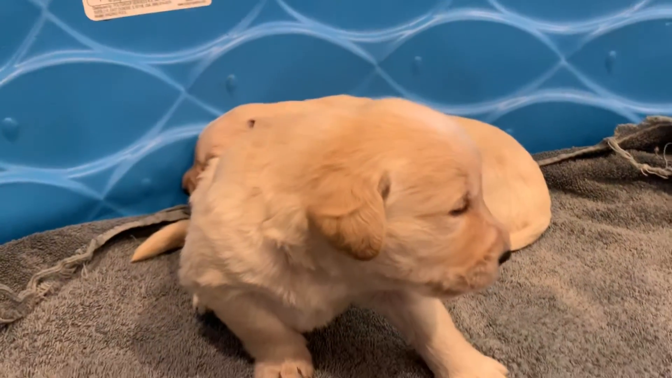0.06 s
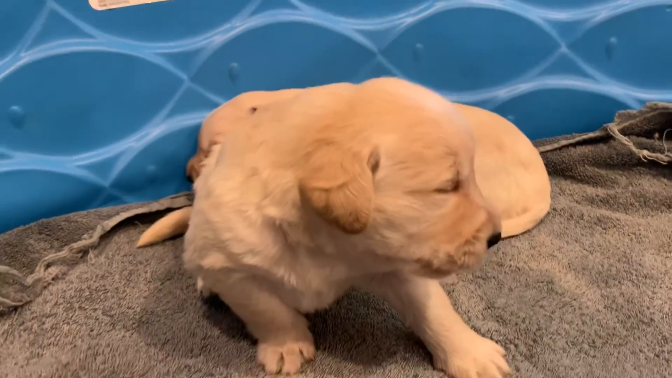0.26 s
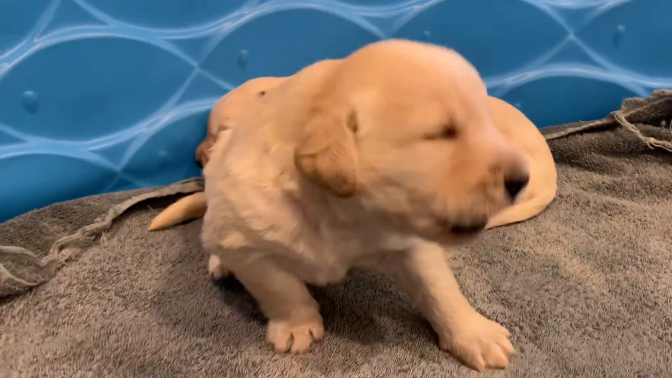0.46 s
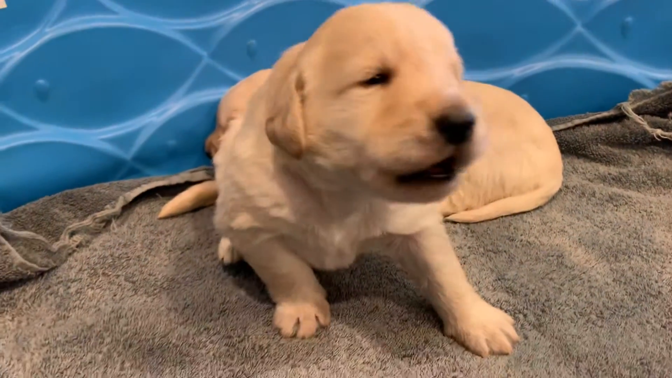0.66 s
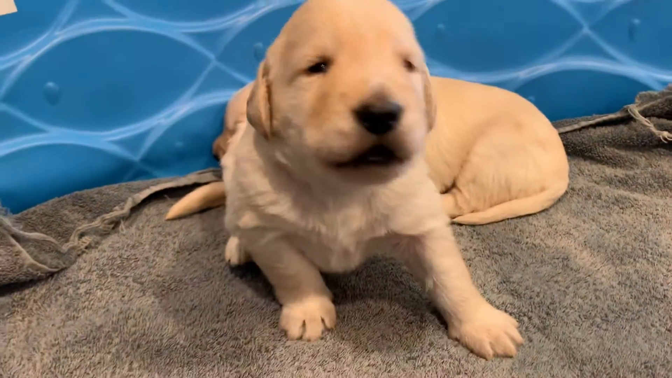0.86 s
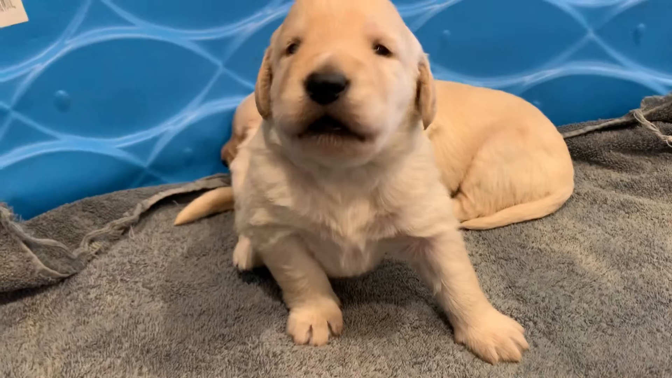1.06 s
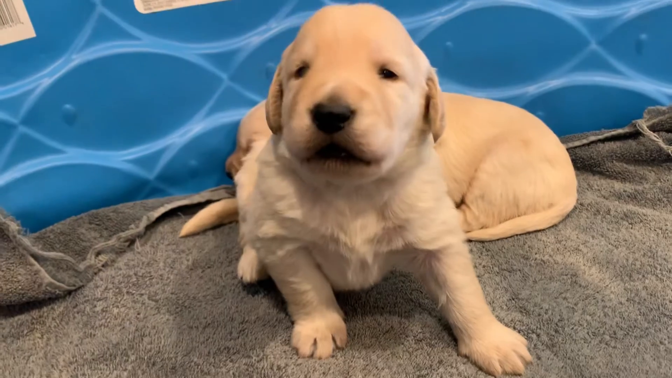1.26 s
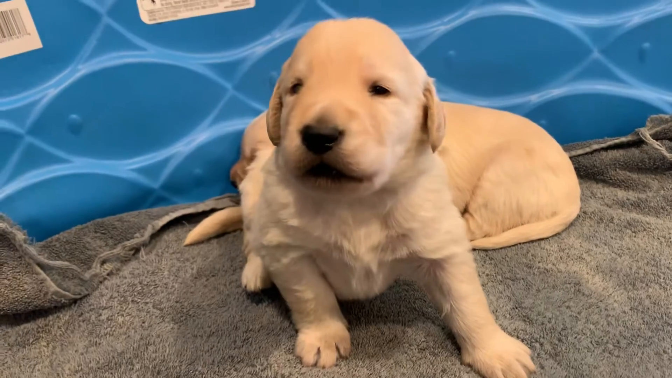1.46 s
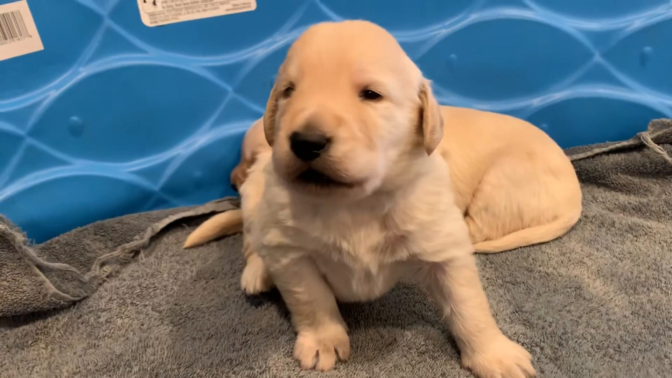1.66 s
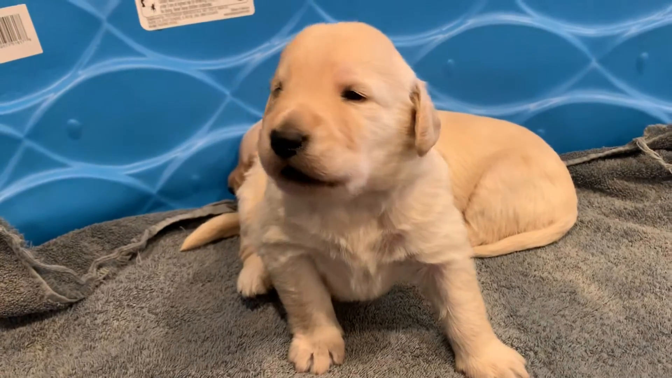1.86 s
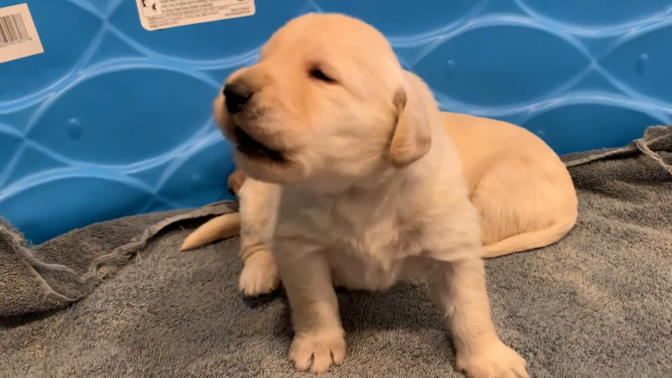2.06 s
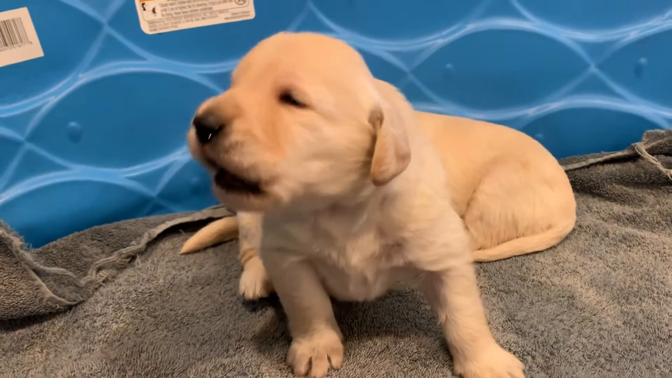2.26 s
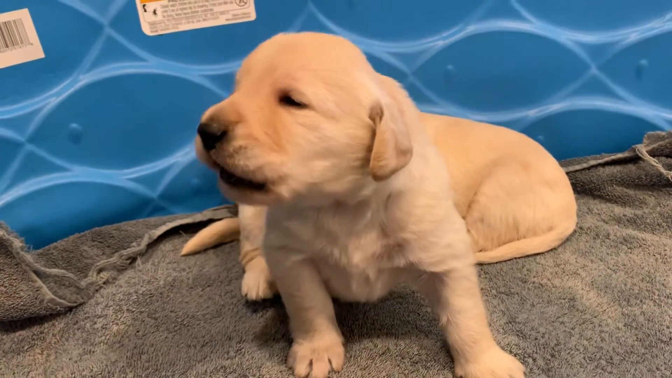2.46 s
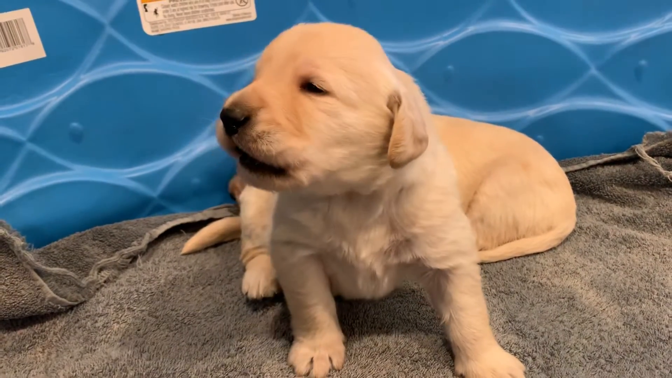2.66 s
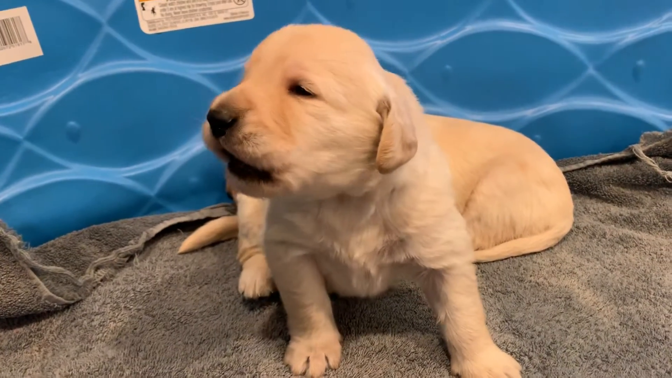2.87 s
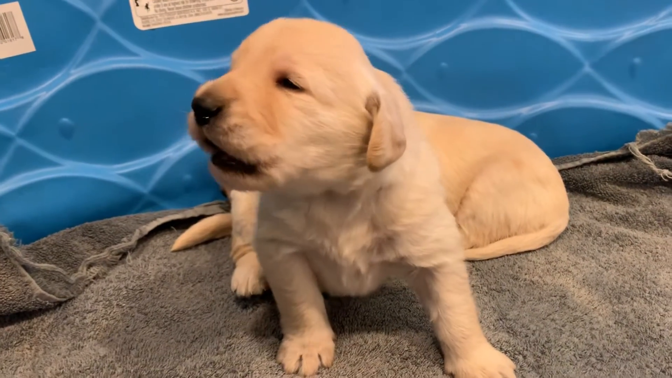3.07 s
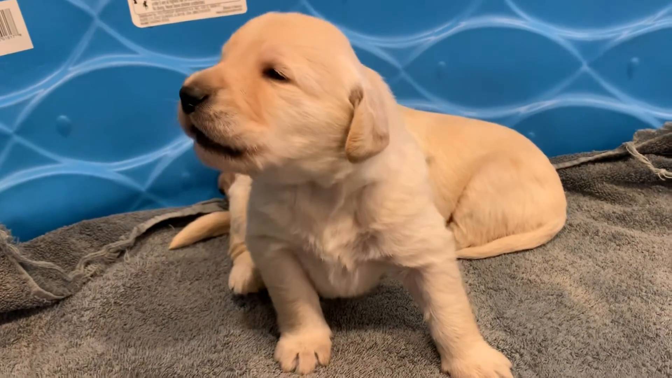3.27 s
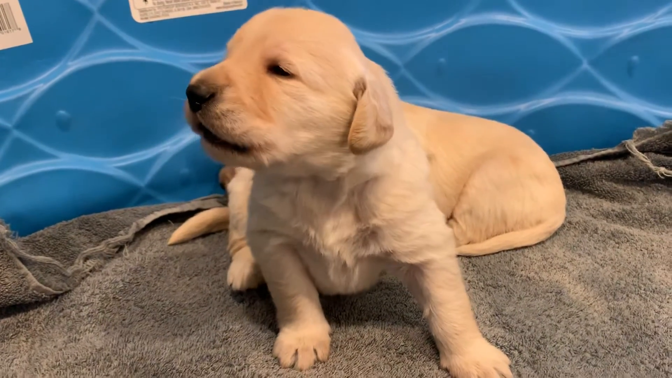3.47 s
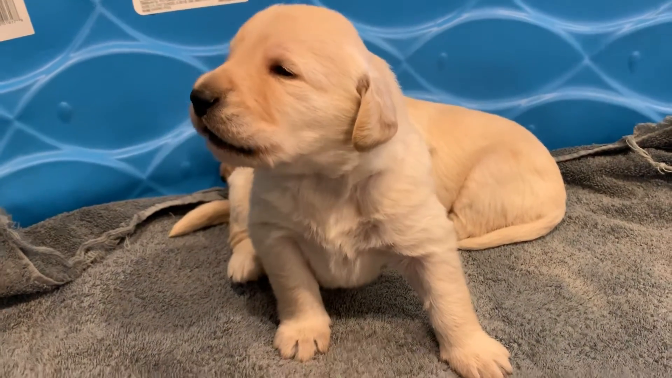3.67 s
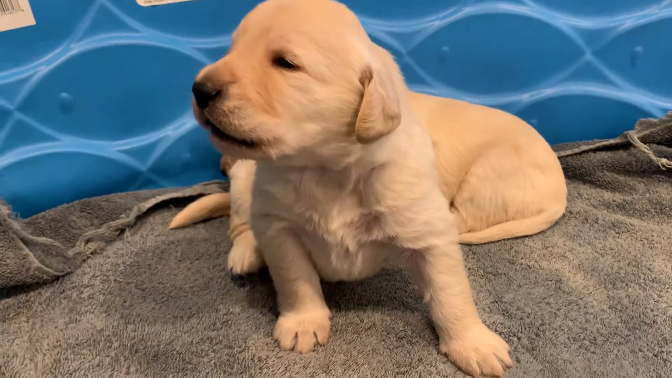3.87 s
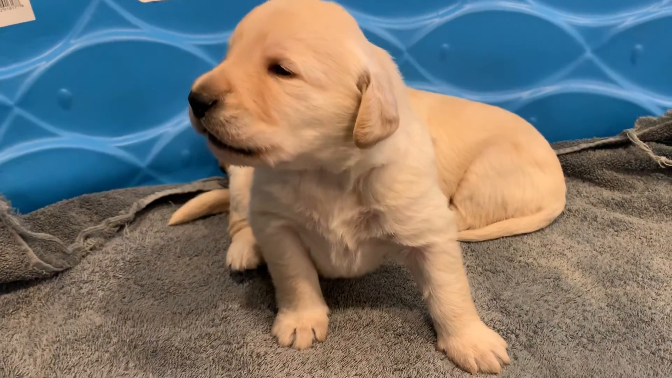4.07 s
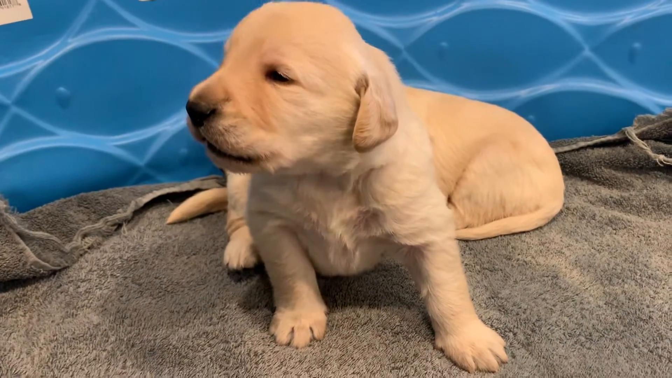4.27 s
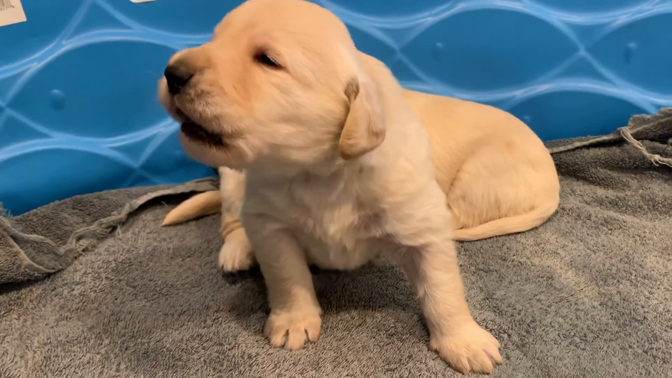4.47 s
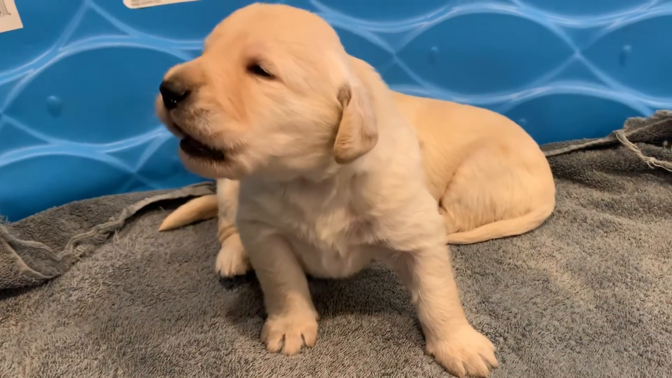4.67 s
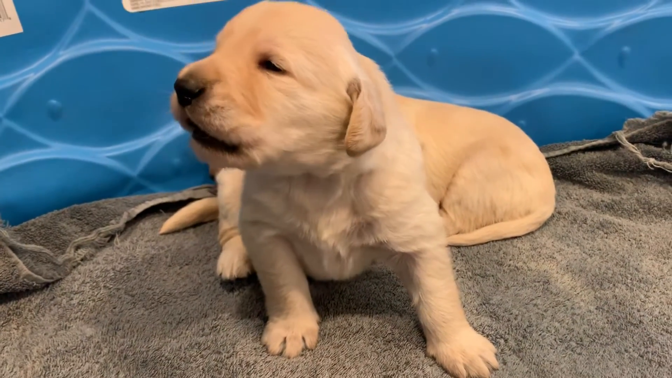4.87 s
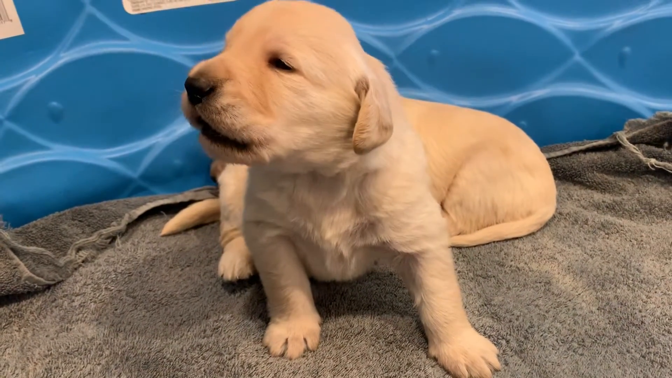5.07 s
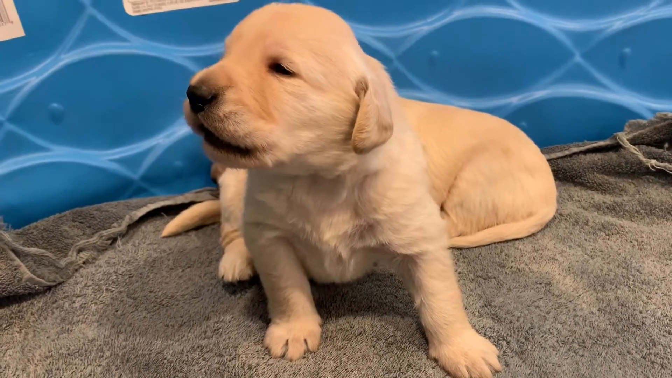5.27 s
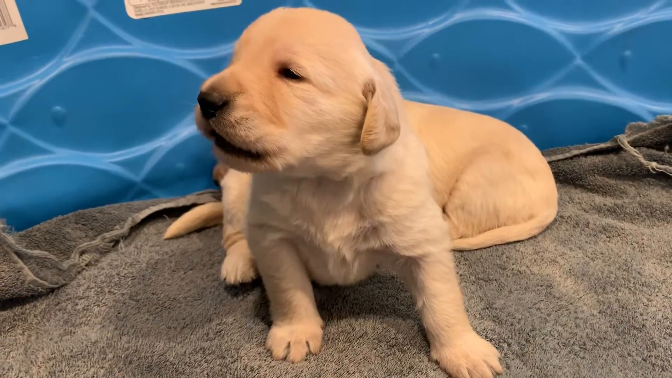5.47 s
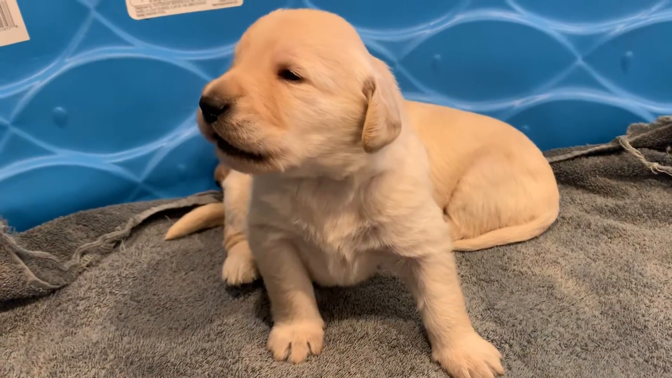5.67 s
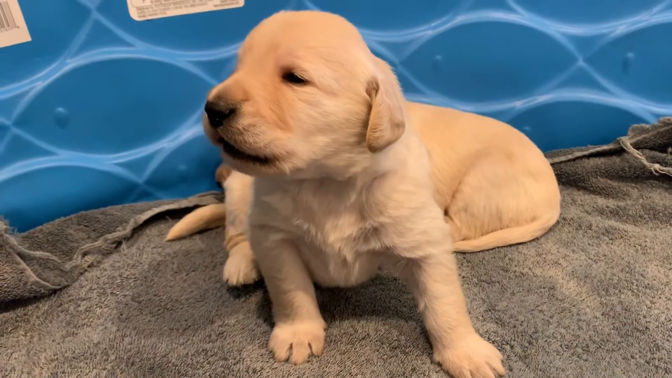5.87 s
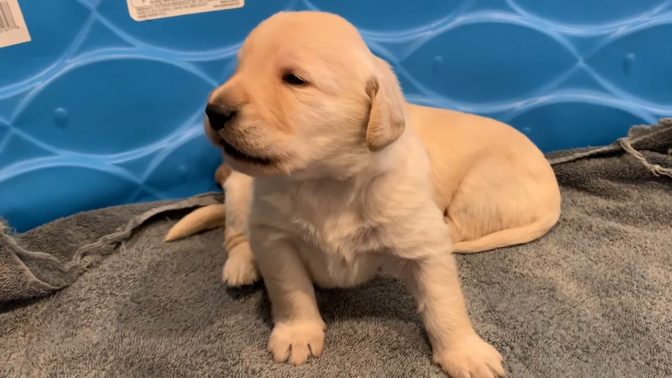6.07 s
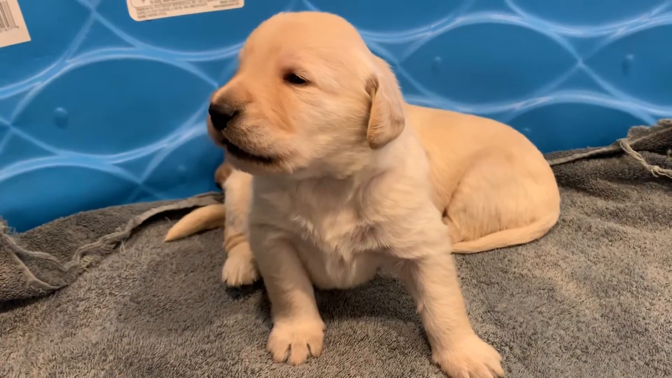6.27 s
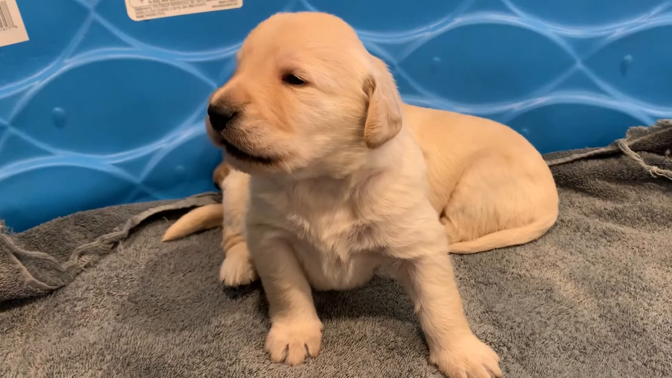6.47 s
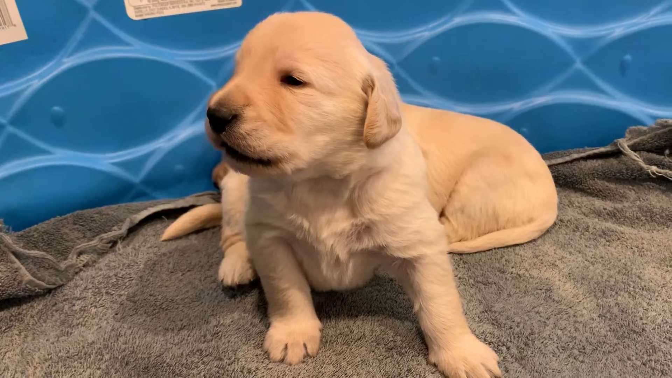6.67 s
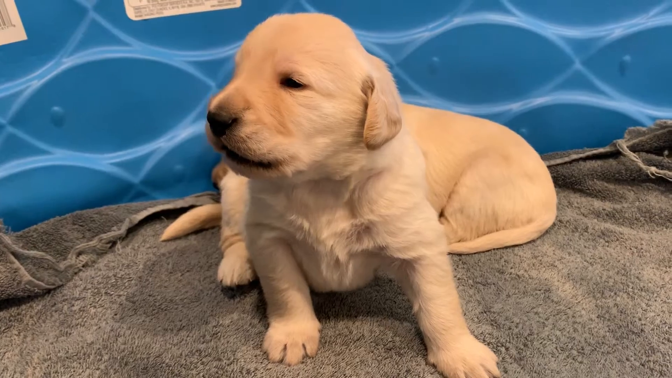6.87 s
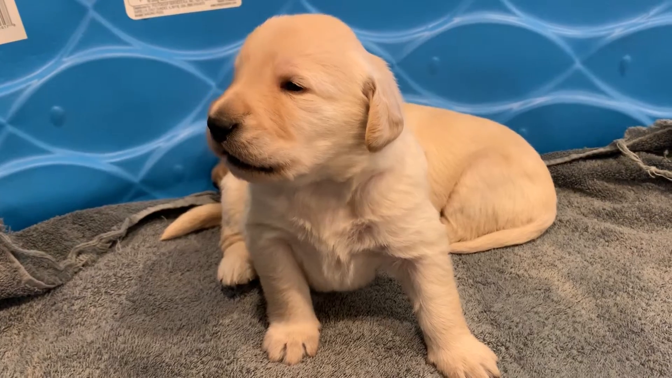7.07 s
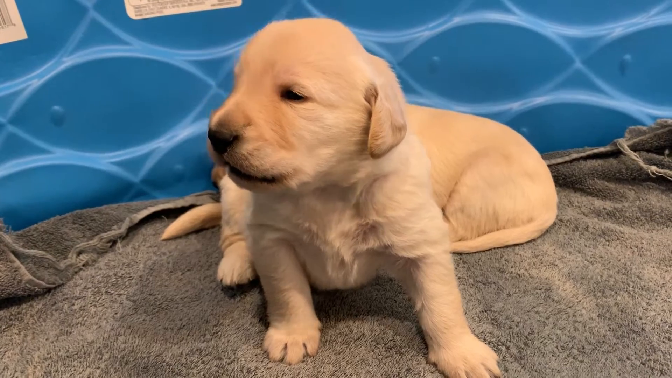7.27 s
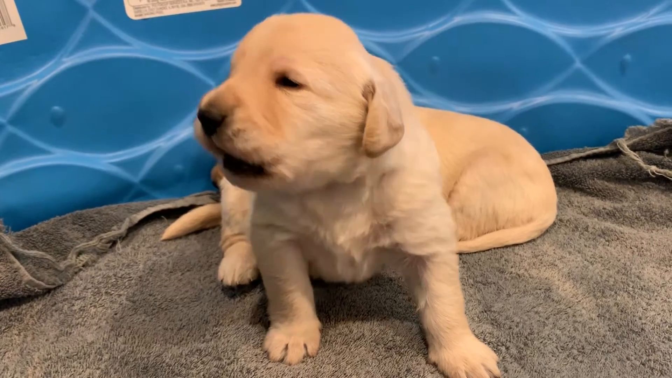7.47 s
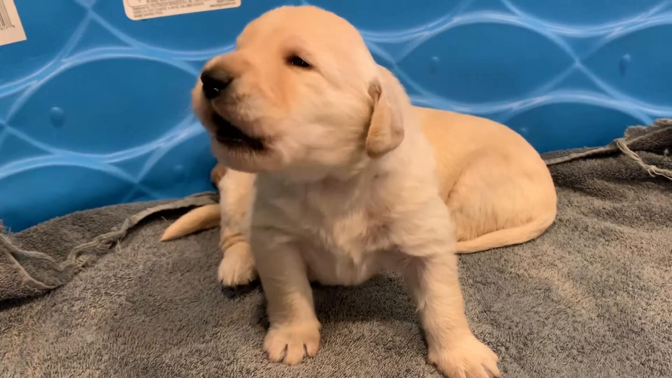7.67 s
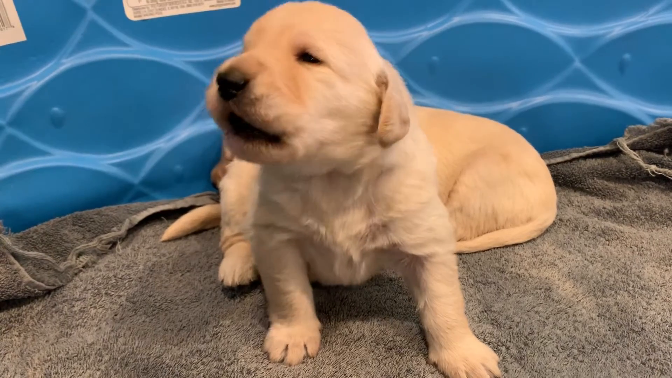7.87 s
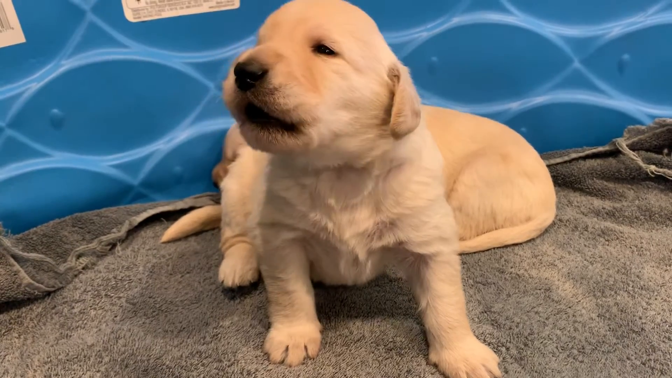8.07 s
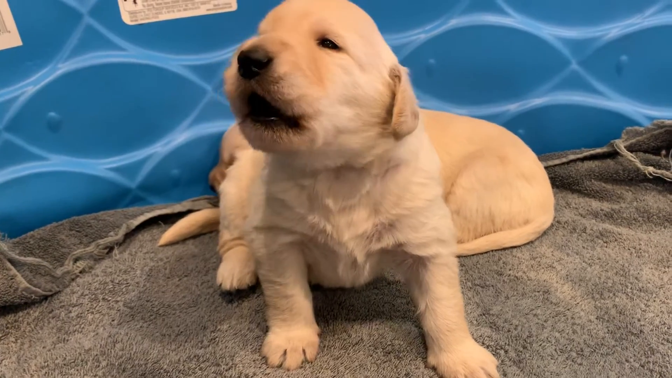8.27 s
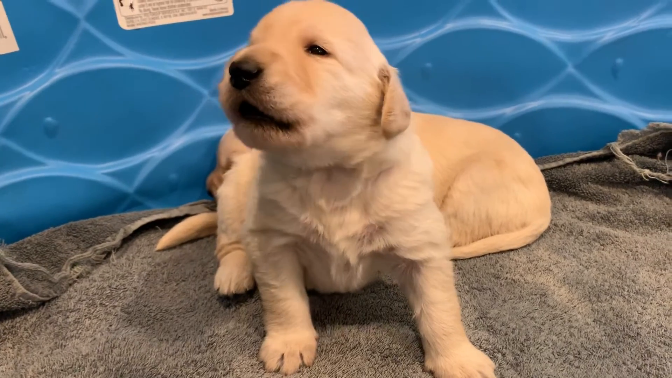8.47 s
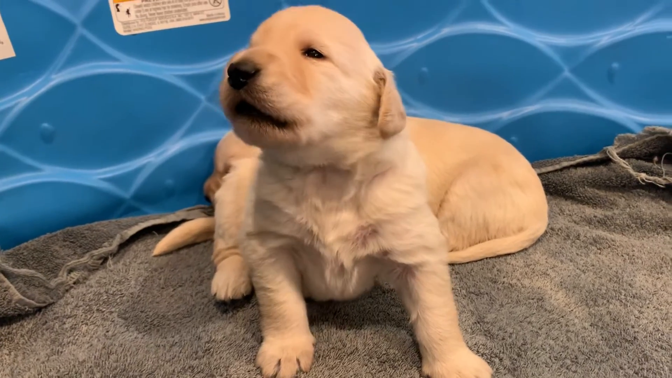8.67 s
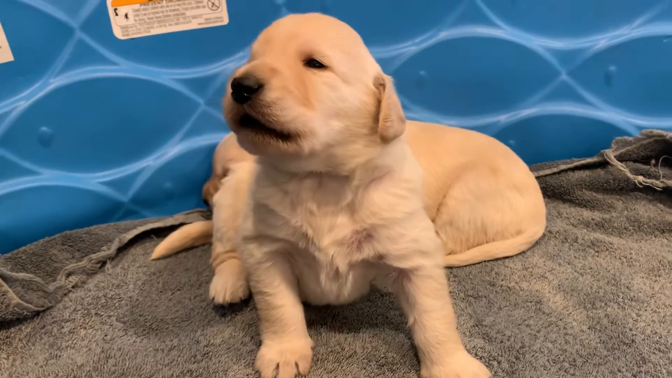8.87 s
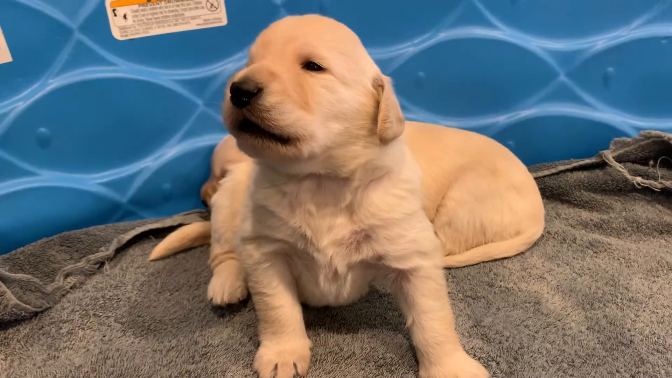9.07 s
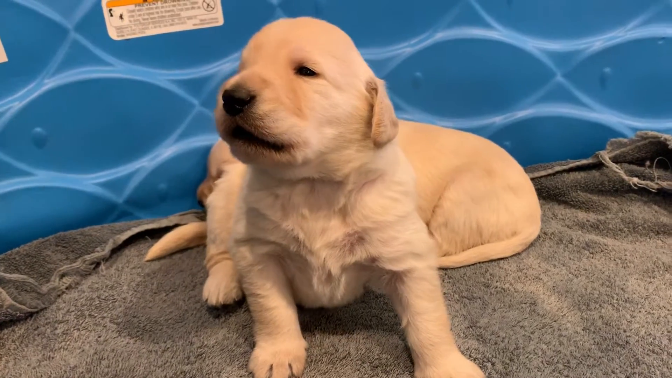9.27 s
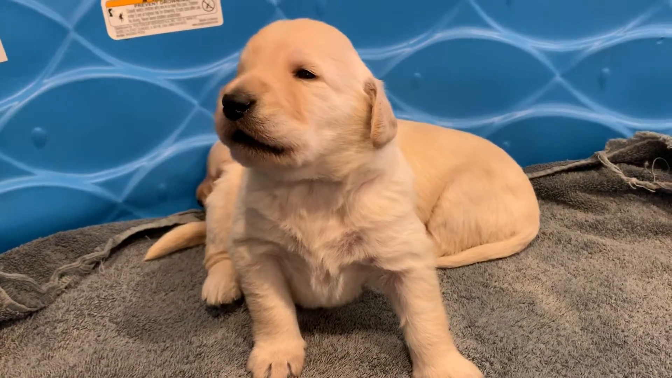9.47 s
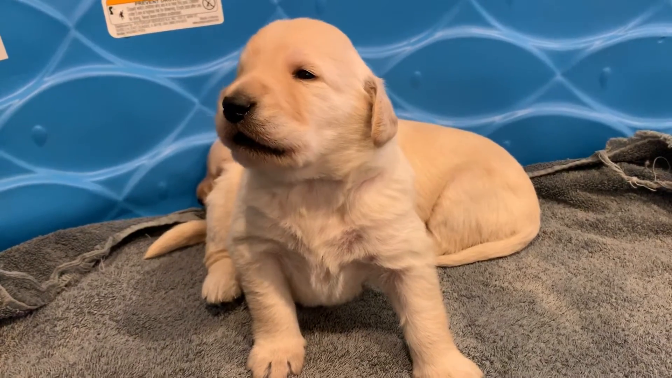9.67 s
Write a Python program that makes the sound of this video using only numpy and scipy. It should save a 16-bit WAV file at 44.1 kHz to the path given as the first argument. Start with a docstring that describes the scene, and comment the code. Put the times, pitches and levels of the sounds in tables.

```python
"""Throbbing growls of a very young puppy, close by: four calls that tighten into rough, high yelps and sink back.
A soft grunt and a thin whimper end it; the room rumbles and hums faintly.
Voice: fold pulses and turbulence through throat, mouth and teeth filters, one pitch sweep from growl to yelp.
Whimper: a few sine partials. Grunts, bumps, rumble: filtered noise. Hum: a sine.
Head direction, pen walls and a short room tail shape the stereo."""
import sys
import numpy as np
from scipy import signal
from scipy.fft import rfft, irfft, next_fast_len
from scipy.io import wavfile
from scipy.ndimage import uniform_filter1d, minimum_filter1d, map_coordinates

SR = 44100
rng = np.random.default_rng(int(sys.argv[2]) if len(sys.argv) > 2 else 0)


def output_pcm(signal):
    """Save a mono or channel-first signal as 16-bit PCM at the path in sys.argv[1].

    Samples are clipped to [-1, 1] before scaling.
    """
    pcm = np.clip(np.atleast_2d(signal).T, -1, 1) * 32767
    wavfile.write(sys.argv[1], SR, np.round(pcm).astype(np.int16))


N = 428211
T = np.arange(N) / SR  # s

# growl under each of the four calls: t/s, resting pitch f/Hz, extra level/dB, extra rasp/dB
GROWLS = [
    [(.025, 145.2, -5.5, -4), (.15, 160, 0.5, -9.5), (.37, 171.6, 2, -21), (.46, 160, 0.5, 2),
     (.75, 149.8, 1, 2), (.87, 149.8, -0.5, -3), (.985, 150.3, -4, -23)],
    [(2.019, 184.8, -3.5, 0), (2.4, 190.6, 1, -3.5), (2.55, 192, -2.5, -14.5), (2.7, 190.1, -3.5, -12),
     (2.8, 189.6, -0.5, -3), (2.92, 171.4, 1, 3.5), (3.16, 174.3, -2, -7), (3.22, 165.2, -17, 0),
     (3.29, 165.1, -22.5, 0)],
    [(4.413, 210.6, -2.5, 3), (4.77, 189.9, -0.5, -8.5), (4.83, 197.5, 1, 3.5), (5., 168, 0.5, 4),
     (5.6, 153, 0, 6), (5.85, 135.2, -0.5, 0.5), (6.06, 117, -5.5, 5), (6.14, 120.7, 1, -1),
     (6.235, 112.9, 0.5, -12)],
    [(7.502, 191.4, -4.5, 0.5), (7.92, 181.6, 0.5, -7.5), (8.05, 186.5, 1, 1.5), (8.2, 180.8, 3, 2.5),
     (8.47, 169.9, 0.5, -3.5), (8.51, 149.7, -4.5, 1.5), (8.58, 144.2, -4, -18), (8.67, 145, -16.5, -6)],
]
# growl versus pitch: f/Hz, roughness/0-1, throat level/dB, mouth level/dB, rasp level/dB
TENSION = [(112, .3, -57, -63, -73.5), (136, .28, -44.5, -55, -75), (159.2, .3, -39, -46.5, -65.5),
           (189.65, .3, -35, -37, -57), (243, .38, -30.5, -31, -54), (277.5, .42, -28.5, -25.5, -47),
           (379.8, .75, -29.5, -20, -40)]
# runs of throbs: first catch t/s, end t/s, throb rate at start, middle, end f/Hz
THROBS = [(0.028, 0.438, 23.4, 24.15, 27.25), (2.38, 2.946, 25, 20.21, 22.91),
          (4.784, 6.181, 19.39, 21.9, 17.27), (7.89, 8.219, 22.7, 23.28, 20.23)]
# yelps: start t/s, climb/s, arch/s, fall/s, top pitch f/Hz, lateness of climb (exponent),
# added roughness/0-1, extra mouth level/dB, extra rasp/dB, rasp fading along the arch/dB
YELPS = [(.494, .046, 0.14, .038, 1265, 1.7, .33, -0.5, 5.5, 8),
         (2.055, .078, 0.14, .059, 1353, 1.3, .18, 0.5, 2, 2.5),
         (2.987, .057, 0.05, .036, 965, 3.4, .13, 0.5, -7.5, -1.5),
         (4.443, .073, .131, .06, 1375, 1.05, .17, 0.5, 0.5, 0.5),
         (7.524, .078, .159, .049, 1407, .95, .13, -1, 1.5, 3.5),
         (8.274, .05, 0.069, .026, 946.7, 3, .07, 0.5, -5, 0)]
# shared by all yelps: stage (0 leap, 1 lock, 2 crack, 3 fall), roughness/0-1, throat, mouth, rasp level/dB
YELP_STAGES = [(0, .48, -33, -20.5, -23), (.5, .4, -42.5, -19.5, -22.5), (1, .18, -46.5, -19.5, -22.5),
               (1.499, 0.012, -48.5, -18.5, -27), (1.95, .1, -47.5, -19.5, -30),
               (2.15, .32, -46.5, -21.5, -35.5), (3, .5, -33.5, -22.5, -45)]
# lip opening in the growl: t/s, opening/0-1
LIP_OPENING = [(.35, 0), (.5, .2), (.7, .8), (2, 1)]

# relative voice spectra: f/Hz, level/dB per Hz
THROAT_SLACK = [(60, -52.5), (110, -14), (160, 2.5), (230, 3.5), (320, 8), (380, -7), (460, -14),
                (700, -46)]
THROAT_TIGHT = [(60, -37.5), (160, -17), (260, -4), (330, 5.5), (400, -8.5), (480, -5), (750, -50)]
MOUTH_SHUT = [(300, -50), (480, -9), (670, 4), (780, -6), (950, -23.5), (1350, -26), (1600, -31),
              (1850, -30), (2400, -62.5)]
MOUTH_AJAR = [(300, -37), (520, -8), (660, 10), (800, 4.5), (1050, -9), (1320, 7.5), (1490, -3),
              (1700, -17.5), (1900, -18), (2600, -52)]
MOUTH_WIDE = [(300, -53.5), (520, -25), (660, -12), (850, -12), (1020, -11.5), (1220, 4), (1400, -2.5),
              (1600, -19.5), (1900, -25), (2400, -49.5)]
# turbulence in the open mouth: f/Hz, level/dB per Hz
HOARSE = [(600, -38.5), (950, -4), (1250, -1.5), (1600, -3.5), (2000, -8.5), (2800, -43)]
RASP_NARROW = [(1500, -51), (2000, -4.5), (3000, -32), (3550, -16), (3950, 0.5), (4550, -28.5), (5700, -21),
               (6700, -3.5), (7900, -22), (8800, -8), (9900, -37.5), (11200, -8), (12300, -51.5),
               (15500, -64)]
RASP_WIDE = [(1400, -41), (1900, -12.5), (2230, 3), (2550, -2.5), (2900, 1.5), (3350, -1.5), (4100, 1),
             (4650, -8.5), (5400, -11.5), (6450, 0), (8000, -19), (9900, -29), (11700, -21.5), (13500, -39),
             (15500, -48.5)]
# rasp of a locked yelp, a deep hollow between two resonances: f/Hz, level/dB per Hz
RASP_LOCKED = [(1400, -37.5), (1900, -9), (2250, 0), (2650, 0), (3150, -17.5), (3850, 6), (4400, -13.5),
               (5000, -6.5), (5800, 1.5), (6700, -6.5), (8000, -13), (9900, -32), (11700, -15),
               (13500, -35.5), (15500, -52.5)]
# soft fold closure, weakening the highest overtones: f/Hz, gain/dB
CLOSURE = [(2000, 1), (4000, -10.5), (6000, -10), (9000, -7.5), (15000, -11)]

# whimper contour: t/s, pitch f/Hz, peak level/dB
WHIMPER = [(9.07, 1543, -77), (9.092, 1563, -45.5), (9.11, 1580, -36.5), (9.144, 1722, -36),
           (9.168, 1738, -39.5), (9.194, 1680, -43), (9.22, 1643, -93)]
# whimper partials: multiple of the pitch, relative level/dB
WHIMPER_PARTIALS = [(1, 6.5), (2, -30), (3, -22.5), (4, -19.5), (5, -31)]
# soft grunts and bumps: t/s, initial level/dB, t60/s
BUMPS = [(1.545, -58, 0.062), (6.127, -40.5, 0.053), (8.946, -49, 0.22)]
# relative bump spectrum: f/Hz, level/dB per Hz
BUMP_COLOUR = [(40, -4), (120, 13), (330, 11.5), (750, -7.5), (1100, -22), (3000, -40), (8000, -68)]

# head turned right or left, as the two ports hear it: f/Hz, L-R level/dB, left lead/rad, level/dB
HEAD_RIGHT = [(170, -4, 0.55, 1.5), (338, 2, 0, 1), (520, -2.5, 0.86, 4.5), (716, 3.5, 0.9, -1.5),
              (1040, 0, 1, 0.5), (1440, 1.5, -0.22, -1.5), (1870, 3, 1.5, 5.5), (2200, 1.5, 1.6, 6.5),
              (2770, -0.5, -0.5, -10.5), (4000, -2, 2.5, 1.5), (5770, -10, 1, -4.5), (6400, -4.5, 2, 0.5),
              (7187, 2, 2, 2.5), (7930, -1.5, 0, -7.5), (10000, 1, -4.5, -11), (15017, -3, -11.5, -3.5)]
HEAD_LEFT = [(170, -2.5, 0.35, 0), (407, 0.5, 0.25, 0), (553, 1.5, 2, 0), (850, 14.5, -0.25, 0),
             (1137.5, 8.5, -1.5, 0.00015), (1480, 4, 1.5, 0.032), (1820, 1.5, 1.5, 0.031),
             (2320, 0.5, 3.5, 0), (2900, -1, 3, 0.023), (3320, 3.5, 3.5, 0.00065), (4583, -5, 6, 0.00005),
             (5340, -8.5, 7.5, 0.00032), (6640, -0.5, 8, 0.12), (8000, -0.5, 6.5, 0), (13400, 0, -2, 0.68),
             (14980, -1.5, -1, 0)]
# pen wall echoes: f/Hz, gain/dB
PEN_WALLS = [(500, -31.5), (1300, -16), (2200, -9), (12000, -14.5)]
# room tail: f/Hz, t60/s, level/dB
ROOM_TAIL = [(151.5, 0.17, -20), (1280, 0.32, -16.5), (2463, 0.21, -14.5), (6000, 0.062, -14),
             (14000, 0.13, -15.5)]
# relative rumble spectrum: f/Hz, level/dB per Hz
RUMBLE_COLOUR = [(12, -31), (22, -12), (60, -4), (80, -7.5), (110, -13), (200, -24), (320, -23),
                 (550, -31.5), (1100, -37), (3000, -47.5), (5700, -47), (8000, -42.5), (10000, -50),
                 (15500, -54.5)]

ATTACK_S, RELEASE_S, FADE_DB = .009, .047, 31.5  # call edges and their depth
# pitch the growl tightens towards before a yelp, and slackens from after it
WIND_UP_S, WIND_UP_HZ, WIND_UP_RASP_DB = .032, 321.9, 12.5
UNWIND_S, UNWIND_HZ, UNWIND_RASP_DB = .06, 392.5, -2
CATCH_DB, CATCH_HZ, CATCH_GROWTH = 3, 190, 4.9  # depth at this pitch; exponent deepens it when slacker
LEAP_HZ, FALL_HZ = 560.6, 662.7  # first and last pitch of the high register
# arch ends lie this share under its top; share of the top left after the crack
ARCH_SAG, ARCH_POWER, CRACK_SHARE = .13, 1.7, .75
# harmonic meeting a resonance: centre f/Hz, half width f/Hz, gain/dB
FLARE_FIRST, FLARE_SECOND, FLARE_RASP = (1320, 230, 12.5), (1320, 160, 10), (4250, 720, 5)
TURN_S = 1.5  # head turns from right to left
RUMBLE_DB, SWELL_DB, SWELL_S = -68, 8, .24  # rumble, and its swell around the calls
HUM_HZ, HUM_DB = 60, -69.5
TOP_HZ = 15750


def voice():
    """Folds throb in the growl and tighten into the yelp; throat, mouth and teeth colour their pulses."""
    pitch, rough, throat_db, mouth_db, rasp_db = controls()
    wide = smooth(np.clip((pitch - 250) / 220, 0, 1), .02)  # jaw drops as pitch climbs
    lips = np.clip(curves(LIP_OPENING)[0], 0, 1)

    # each catch slackens the folds and chokes the flow; they reopen with a croak
    catch = throb(delay_s=0, width_s=.012)
    reopening = throb(delay_s=.012, width_s=.007)
    depth_db = CATCH_DB * (CATCH_HZ / pitch) ** CATCH_GROWTH
    choke_db = depth_db * swing(catch)
    croak_db = depth_db * (.4 * lips * swing(reopening) - .35 * swing(catch))
    bend = 1 + .27 * lips * throb_sweep() - .19 * swing(catch)
    rough = np.clip(rough + .25 * catch, 0, 1)

    folds, air = fold_flow(pitch, bend, rough, wide)
    buzz = folds + .8 * rough ** 1.5 * air
    rasp = coloured(folds, CLOSURE) + (rough * (2.4 - 1.4 * wide) + .14) * air

    throat = steady(blend(wide, coloured(buzz, THROAT_SLACK), coloured(buzz, THROAT_TIGHT)))
    growl = blend(lips, coloured(buzz, MOUTH_SHUT), coloured(buzz + .67 * air, MOUTH_AJAR))
    mouth = steady(blend(wide, growl, coloured(buzz, MOUTH_WIDE)))
    cry = blend(locking(), coloured(rasp, RASP_WIDE), coloured(rasp, RASP_LOCKED))
    teeth = steady(blend(wide, coloured(rasp, RASP_NARROW), cry))

    # a rough voice comes in uneven spurts
    spurt_db = rough * 2.2 * wobble(70)
    flicker_db = (3.6 - 1.4 * wide) * wobble(45)
    # the pressed yelp stumbles: its tone drops out for a few cycles at a time
    dropout_db = swing(22 * np.maximum(wobble(260), 0) ** 1.5)
    stumble_db = np.clip(pitch / 500 - 1, 0, 1) * np.minimum(rough, .3) * dropout_db
    hoarse = wide * rough * .3 * unit(coloured(air, HOARSE))
    mouth = mouth * amp(-stumble_db) + hoarse

    throat = throat * amp(throat_db - choke_db)
    mouth = mouth * amp(mouth_db + croak_db + spurt_db)
    teeth = teeth * amp(rasp_db + croak_db + spurt_db + flicker_db)
    return during(GROWLS) * (throat + mouth + teeth)


def fold_flow(pitch, bend, rough, wide):
    """Jittered fold pulses, and turbulence that peaks once a cycle while the folds stand open."""
    wander = .08 * wobble(130) + .13 * wobble(600) + .13 * wobble(1800)
    jitter = rough * (1 - .6 * wide) * wander  # slack folds wander more than taut ones
    cycles = np.cumsum(pitch * bend * (1 + jitter)) / SR
    shimmer = amp(rough * 7 * wobble(300))
    folds = pulses(cycles) * np.sqrt(SR / pitch) * shimmer
    air = rng.standard_normal(N) * (1 + .76 * np.cos(2 * np.pi * cycles))
    return folds, air


def pulses(cycles, order=8):
    """A windowed-sinc click, placed between samples, at every whole cycle."""
    at = np.interp(np.arange(1, int(cycles[-1])), cycles, np.arange(N))
    taps = at.astype(int)[:, None] + np.arange(1 - order, order + 1)
    lag = taps - at[:, None]
    click = np.sinc(lag) * np.sinc(lag / order)
    return np.bincount(np.clip(taps, 0, N - 1).ravel(), click.ravel(), N)


def controls():
    """Fold tension: the growl, with a register change within a few milliseconds for each yelp."""
    state = growling()
    for row in YELPS:
        leap, _, _, fall = stages(row)
        inside = (T >= leap) & (T < fall)
        state[:, inside] = yelping(T[inside], row)
    return smooth(state, .004)


def growling():
    """Pitch, roughness and three levels of the growl: tighter is higher; it winds up and unwinds at yelps."""
    rest, level_db, extra_rasp_db = curves(np.vstack(GROWLS))
    yelps = [stages(row) for row in YELPS]
    wind_up = sum((T < fall) * np.exp(-np.maximum(leap - T, 0) / WIND_UP_S) for leap, _, _, fall in yelps)
    unwind = sum((T >= fall) * np.exp(-np.abs(T - fall) / UNWIND_S) for _, _, _, fall in yelps)
    pitch = rest + (WIND_UP_HZ - rest) * wind_up + (UNWIND_HZ - rest) * unwind

    opened = 0
    for rows in GROWLS:
        onset = (T - rows[0][0]) / ATTACK_S
        release = (rows[-1][0] - T) / RELEASE_S
        opened = opened + np.clip(np.minimum(onset, release), 0, 1)
    level_db = level_db - FADE_DB * (1 - opened)

    hz, *columns = np.transpose(TENSION)
    rough, throat_db, mouth_db, rasp_db = (np.interp(pitch, hz, c) for c in columns)
    rasp_db = rasp_db + extra_rasp_db + WIND_UP_RASP_DB * wind_up + UNWIND_RASP_DB * unwind
    return np.array([pitch, rough, throat_db + level_db, mouth_db + level_db, rasp_db + level_db])


def yelping(t, row):
    """Pitch, roughness and three levels of a yelp: leap, climb, arch of clear tone, crack, fall."""
    *_, top, lateness, extra_rough, level_db, extra_rasp_db, fading_db = row
    stage = np.interp(t, stages(row), np.arange(4))
    climb = LEAP_HZ * (top * (1 - ARCH_SAG) / LEAP_HZ) ** (np.minimum(stage, 1) ** lateness)
    arch = top * (1 - ARCH_SAG * np.abs(2 * (stage - 1) - 1) ** ARCH_POWER)
    drop = FALL_HZ * (top * CRACK_SHARE / FALL_HZ) ** (1 - (stage - 2))
    pitch = np.select([stage < 1, stage < 2], [climb, arch], drop)

    knots, *columns = np.transpose(YELP_STAGES)
    rough, throat_db, mouth_db, rasp_db = (np.interp(stage, knots, c) for c in columns)
    pressed = stage < 2
    mouth_db = mouth_db + pressed * (flare(pitch, FLARE_FIRST) + flare(2 * pitch, FLARE_SECOND))
    rasp_db = rasp_db + np.clip(2 * (2 - stage), 0, 1) * flare(4 * pitch, FLARE_RASP)
    rasp_db = rasp_db - fading_db * np.clip(stage - 1, 0, 1) ** 2
    return np.array([pitch, rough + extra_rough, throat_db, mouth_db + level_db, rasp_db + extra_rasp_db])


def stages(row):
    """Moments/s at which a yelp leaps, locks, cracks and has fallen back."""
    return np.cumsum(row[:4])


def locking():
    """1 from a yelp's lock until it has fallen back, soft edges."""
    return smooth(sum(1. * (T > lock) * (T < fall) for _, lock, _, fall in map(stages, YELPS)), .025)


def flare(hz, resonance):
    """Gain/dB of a harmonic passing through a flat-topped resonance."""
    centre, width, db = resonance
    return db * np.exp(-np.square(((hz - centre) / width) ** 2))


def catches():
    """Moments/s at which the growl catches between two throbs."""
    moments = []
    for start, end, *rates in THROBS:
        t = np.arange(start, end, 1 / SR)
        rate = np.interp(t, np.linspace(start, end, len(rates)), rates)
        turns = np.cumsum(rate) / SR
        moments.extend(np.interp(np.arange(turns[-1]), turns, t))
    return np.sort(moments)


def throb(delay_s, width_s):
    """Bell of height 1 at a delay after each catch."""
    moments = catches() + delay_s
    midpoints = (moments[1:] + moments[:-1]) / 2
    nearest = moments[np.searchsorted(midpoints, T)]
    return np.exp(-((T - nearest) / width_s) ** 2)


def throb_sweep():
    """Pitch climb per throb: ramp from -1/2 to 1/2, 0 between the runs."""
    moments = catches()
    turn = np.interp(T, moments, np.arange(len(moments)))
    gaps_s = np.append(np.diff(moments), np.inf)[turn.astype(int)]
    return smooth((turn % 1 - .5) * (gaps_s < .08), .004)


def whimper():
    """Thin, nearly pure whistle through the nose: a few harmonics with slight pitch wander."""
    pitch, peak_db = curves(WHIMPER)
    phase = 2 * np.pi * np.cumsum(pitch * (1 + .0014 * wobble(120))) / SR
    tone = sum(amp(level) * np.sin(round(k) * phase) for k, level in WHIMPER_PARTIALS)
    return unit(tone) * amp(peak_db - 3) * during([WHIMPER])  # -3 dB: sine peak to rms


def bumps():
    """Soft grunts and bumps: short, dull puffs of low noise, decaying exponentially."""
    envelope = sum((T > s) * amp(db - 60 * np.abs(T - s) / t60) for s, db, t60 in BUMPS)
    noise = rng.standard_normal(N)
    return coloured(envelope * noise, BUMP_COLOUR) / np.std(coloured(noise, BUMP_COLOUR))


def ports(x, head):
    """Level and phase at the left and right microphone port, frequency by frequency; one set for each head
    direction."""
    def response(hz):
        difference_db = along(head, hz)
        gains = amp(np.array([difference_db, -difference_db]) / 2)
        gains *= amp(along(head, hz, axis=3)) / np.sqrt(np.mean(gains ** 2, axis=0))
        right_phase = np.exp(-1j * along(head, hz, axis=2))
        return gains * np.array([np.ones(len(hz)), right_phase])
    return filtered(x, response)


def pen(x, count=6):
    """Smooth pen walls throw back the treble within milliseconds, differently at each port."""
    delays = (rng.uniform(.0015, .009, (2, count)) * SR).astype(int)
    echoes = np.array([sum(np.pad(x, (d, 0))[:N] for d in port) for port in delays]) / np.sqrt(count)
    return filtered(echoes, lambda hz: amp(along(PEN_WALLS, hz)))


def room(x):
    """Short noise tail in which each frequency dies at its own speed."""
    hz, t, z = signal.stft(rng.standard_normal((2, SR // 2)), SR, nperseg=256)
    fade = amp(-60 * t / along(ROOM_TAIL, hz)[:, None])
    energy = np.sum(fade ** 2, axis=1, keepdims=True) * t[1] * SR
    fade *= amp(along(ROOM_TAIL, hz, axis=2))[:, None] / np.sqrt(energy)
    tail = signal.istft(z * fade, SR, nperseg=256)[1]
    return signal.oaconvolve(x[None], tail, axes=1)[:, :N]


def rumble():
    """Low room noise, nearly the same at both ports, swelling around the calls."""
    mid, side = (unit(coloured(rng.standard_normal(N), RUMBLE_COLOUR)) for _ in range(2))
    level_db = RUMBLE_DB + SWELL_DB * smooth(during(GROWLS), SWELL_S)
    return amp(level_db) * (mid + amp(-10) * np.array([side, -side]))


def hum():
    """Weak mains hum: one sine whose level wavers slowly."""
    return amp(HUM_DB) * np.sin(2 * np.pi * HUM_HZ * T) * amp(2.5 * wobble(5.8))


def amp(db):
    """Decibels to gain."""
    return 10 ** (np.asarray(db) / 20)


def unit(x):
    """x at rms 1."""
    return x / np.sqrt(np.mean(x ** 2) + 1e-20)


def blend(share, a, b):
    """Crossfade from a (share 0) to b (share 1)."""
    return (1 - share) * a + share * b


def along(points, hz, axis=1):
    """One column of (f/Hz, ..) points, interpolated on a log axis."""
    columns = np.transpose(points)
    return np.interp(np.log(hz + 1), np.log(columns[0] + 1), columns[axis])


def curves(rows):
    """One value per sample for each column after the time."""
    s, *columns = np.transpose(rows)
    return [np.interp(T, s, c) for c in columns]


def smooth(x, seconds):
    """Triangular running mean."""
    size = max(int(seconds * SR), 1)
    return uniform_filter1d(uniform_filter1d(x, size), size)


def swing(x):
    """x without its slow mean."""
    return x - smooth(x, .047)


def steady(x):
    """x held at rms 1 from moment to moment."""
    return x / np.sqrt(np.abs(smooth(x * x, .011)) + 1e-12)


def during(tables):
    """1 while one of the tables runs, soft edges."""
    return smooth(sum(1. * (T > rows[0][0]) * (T < rows[-1][0]) for rows in tables), .004)


def wobble(rate_hz):
    """Smooth random curve, rate_hz knots a second."""
    return map_coordinates(rng.standard_normal(int(N * rate_hz / SR) + 4), [T * rate_hz], order=2)


def filtered(x, response):
    """x times a complex response of frequency."""
    size = next_fast_len(N + 8192, True)
    return irfft(rfft(x, size) * response(np.fft.rfftfreq(size, 1 / SR)), size)[..., :N]


def coloured(x, points, size=4096):
    """x through the causal minimum-phase filter that has this spectrum."""
    cepstrum = irfft(np.log(amp(along(points, np.fft.rfftfreq(size, 1 / SR)))))
    cepstrum[1:size // 2] *= 2
    cepstrum[size // 2 + 1:] = 0
    impulse = irfft(np.exp(rfft(cepstrum)))[:size // 2]
    return signal.oaconvolve(x, impulse)[:N]


def scene():
    """The puppy turns its head from right to left after the first call."""
    puppy = voice() + whimper()
    direct = ports(puppy * (T < TURN_S), HEAD_RIGHT) + ports(puppy * (T >= TURN_S), HEAD_LEFT)
    return direct + pen(puppy) + room(puppy) + bumps() + rumble() + hum()


def record(dry):
    """A fast limiter, common to both ports, holds down the peaks; a band limit cuts the top."""
    needed = np.minimum(1, .96 / (np.abs(dry).max(axis=0) + 1e-9))
    gain = smooth(minimum_filter1d(needed, SR // 250), .002)
    return filtered(dry * gain, lambda hz: hz < TOP_HZ)


dry = scene()
out = record(dry)
output_pcm(out)
```